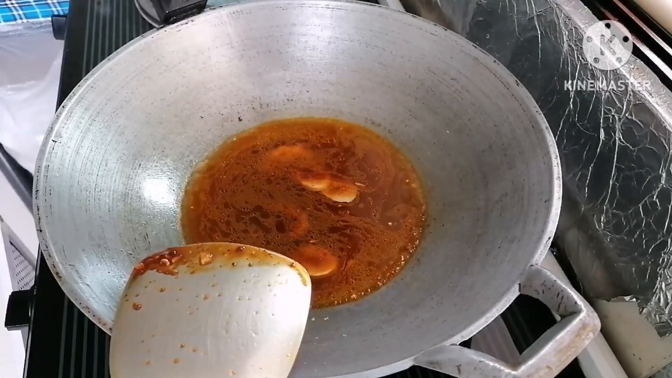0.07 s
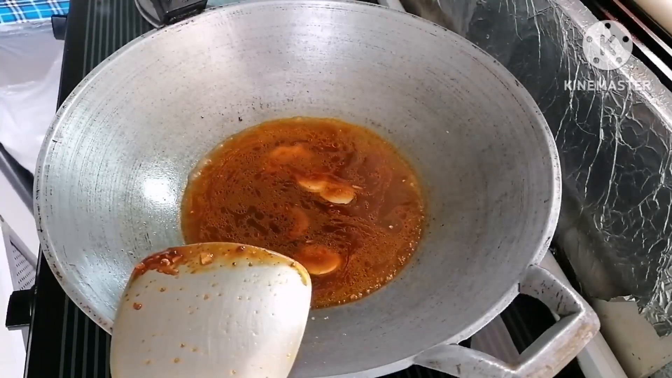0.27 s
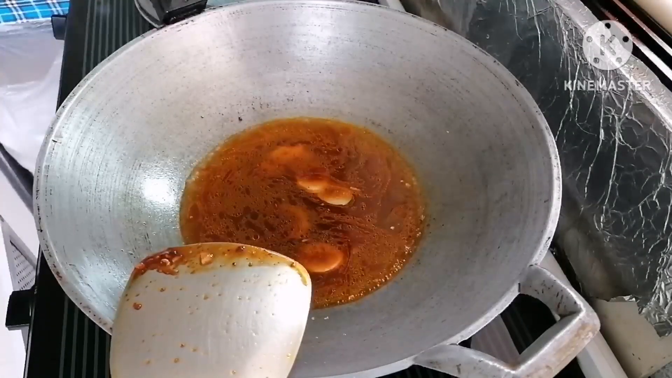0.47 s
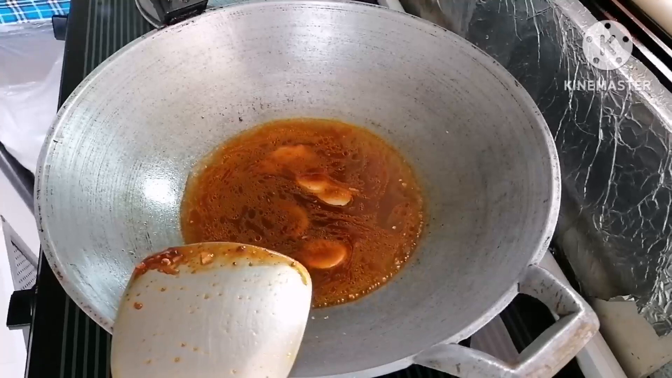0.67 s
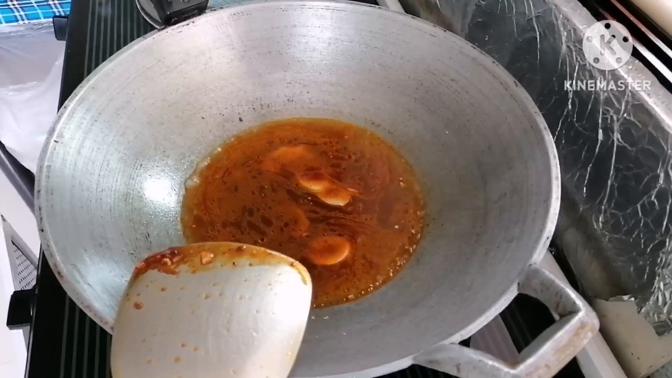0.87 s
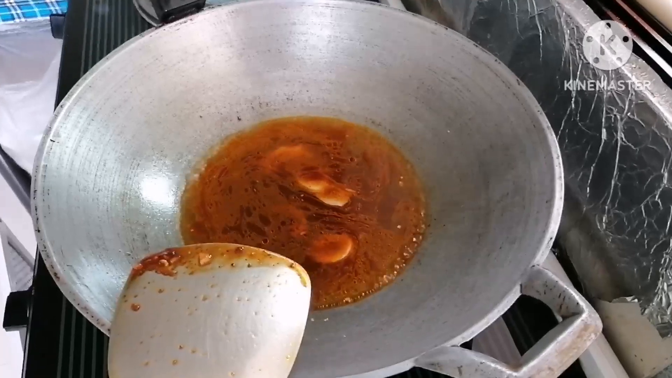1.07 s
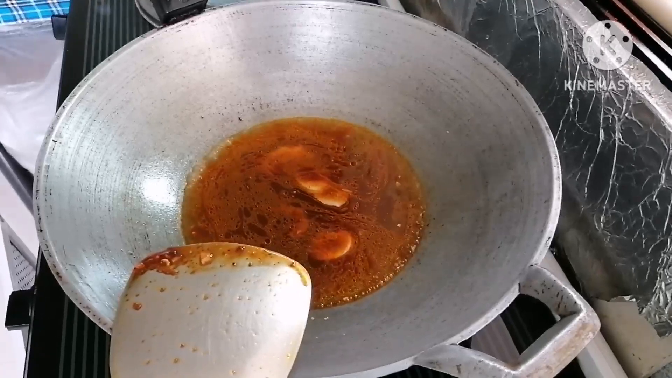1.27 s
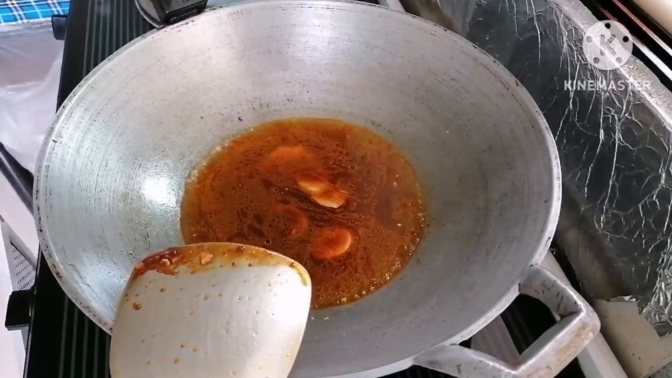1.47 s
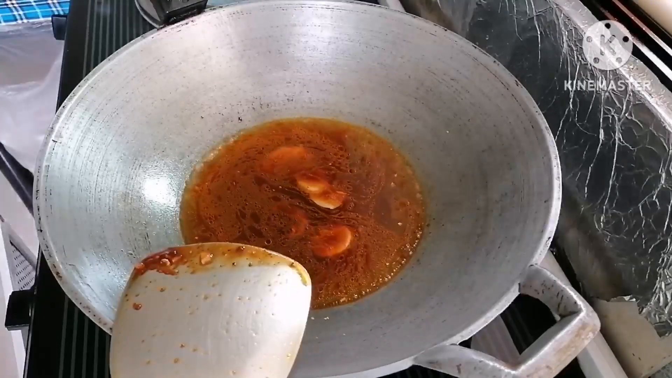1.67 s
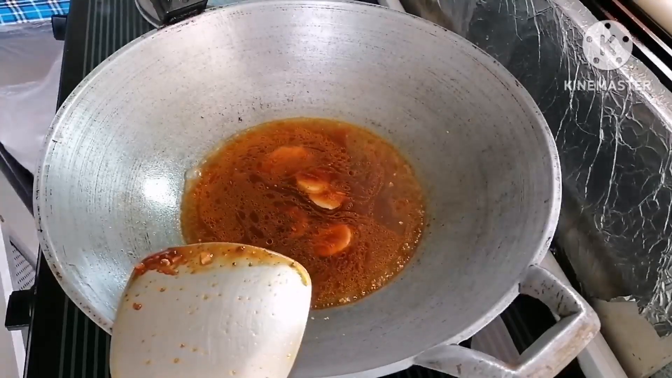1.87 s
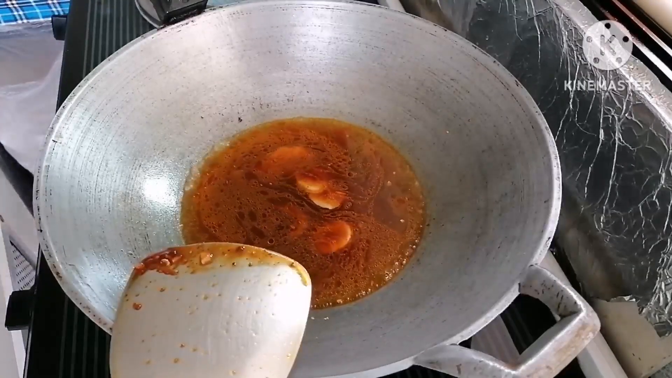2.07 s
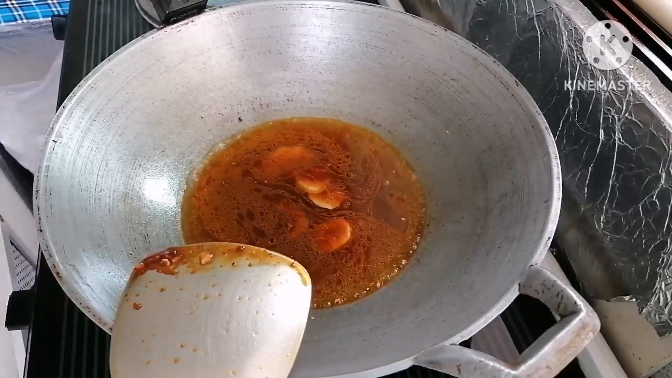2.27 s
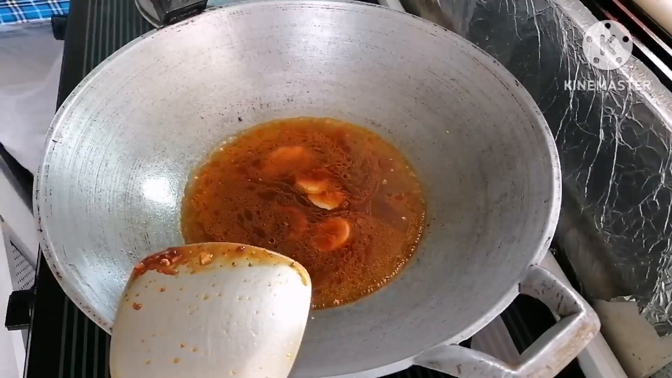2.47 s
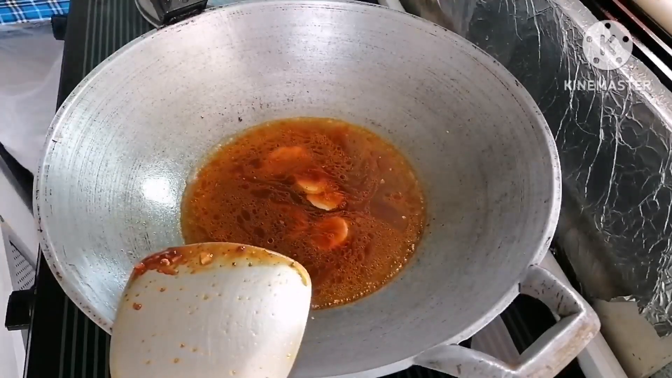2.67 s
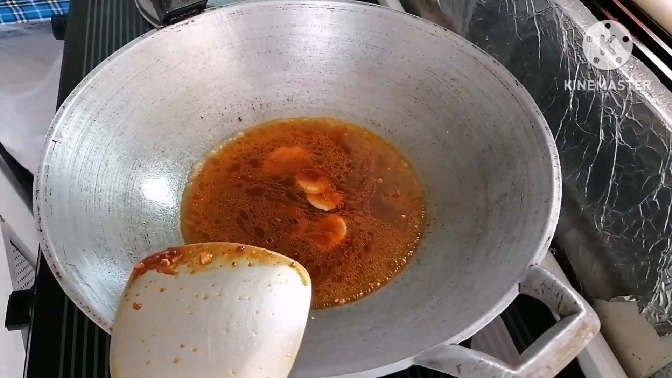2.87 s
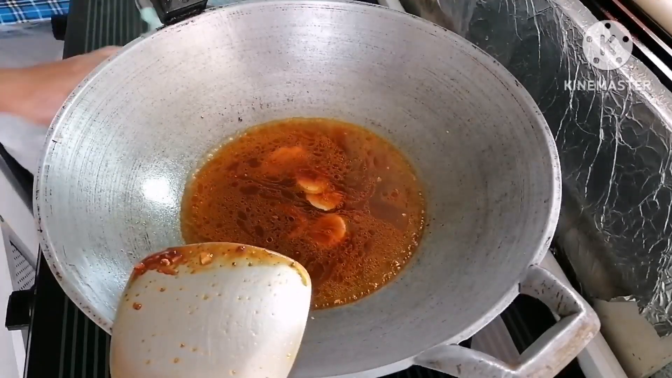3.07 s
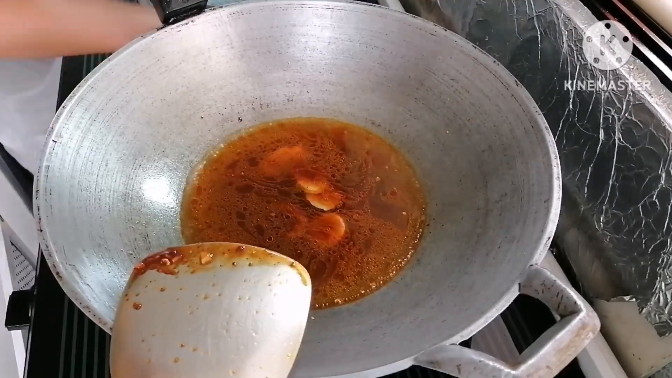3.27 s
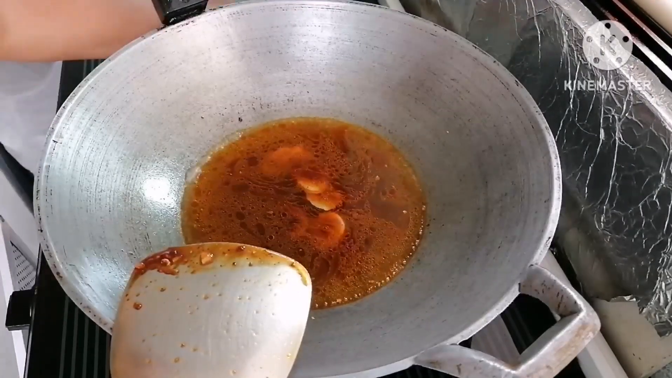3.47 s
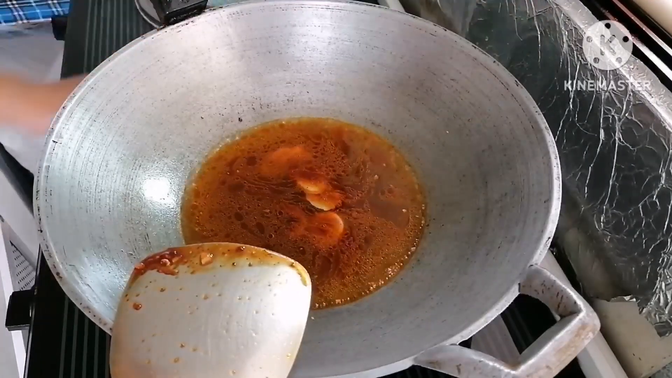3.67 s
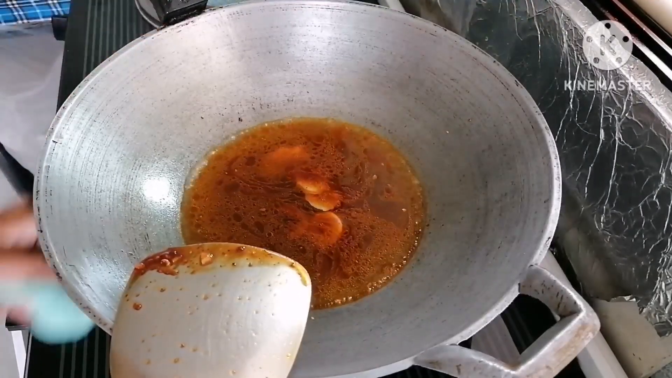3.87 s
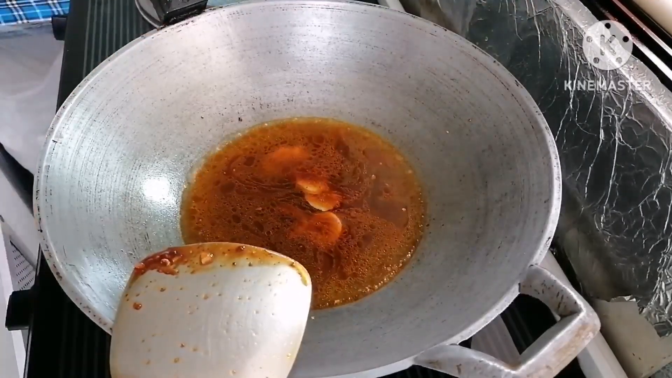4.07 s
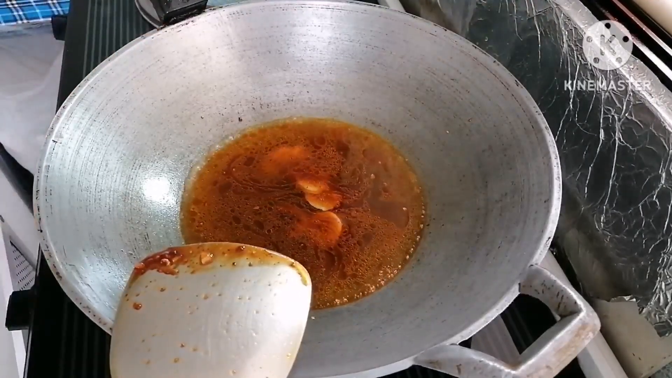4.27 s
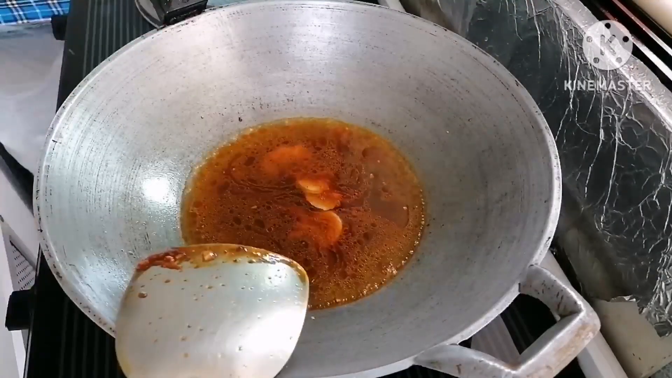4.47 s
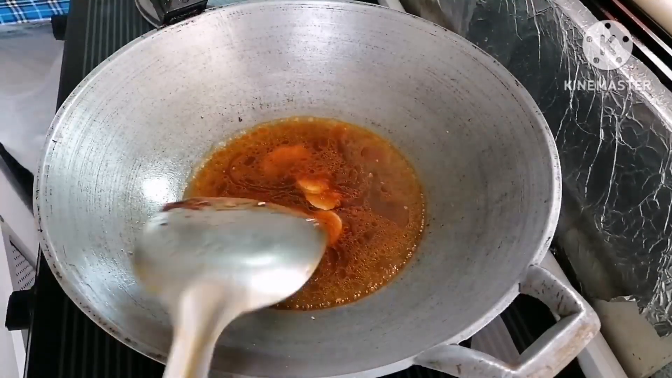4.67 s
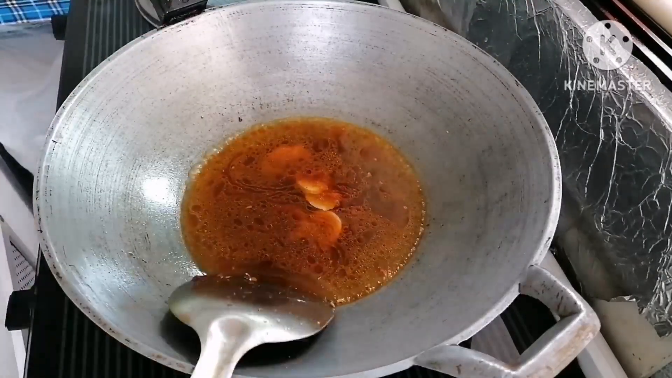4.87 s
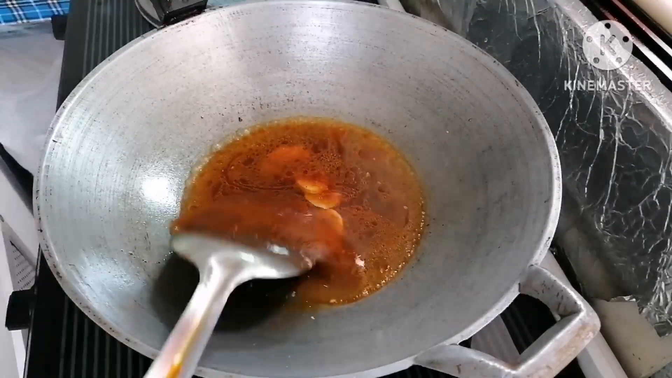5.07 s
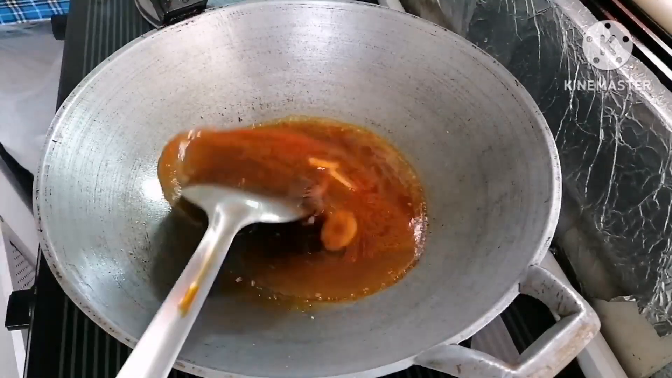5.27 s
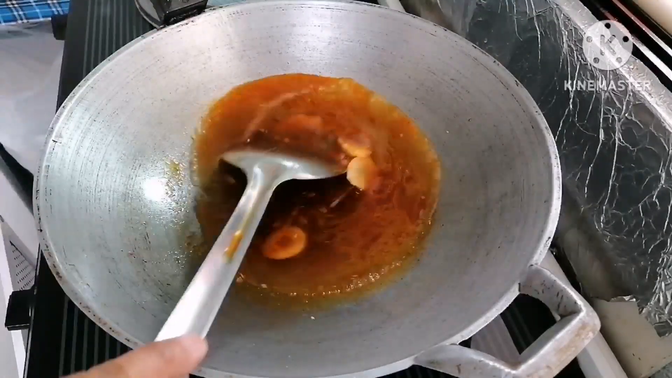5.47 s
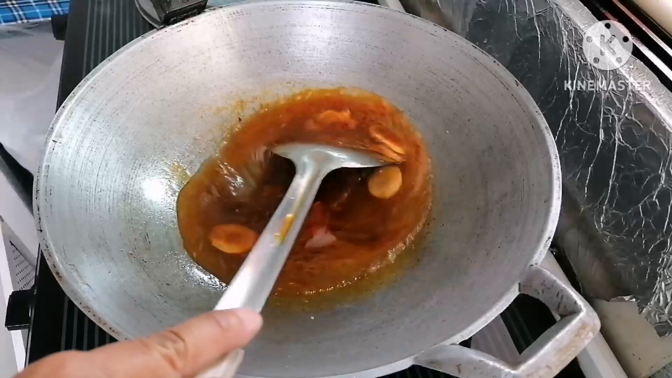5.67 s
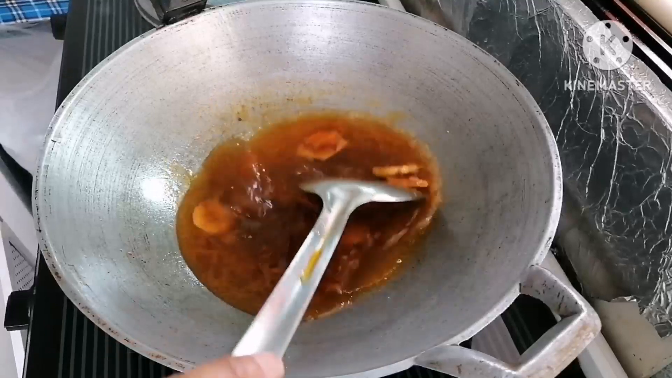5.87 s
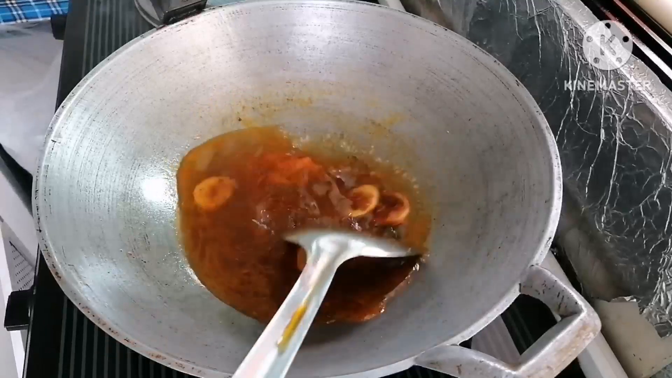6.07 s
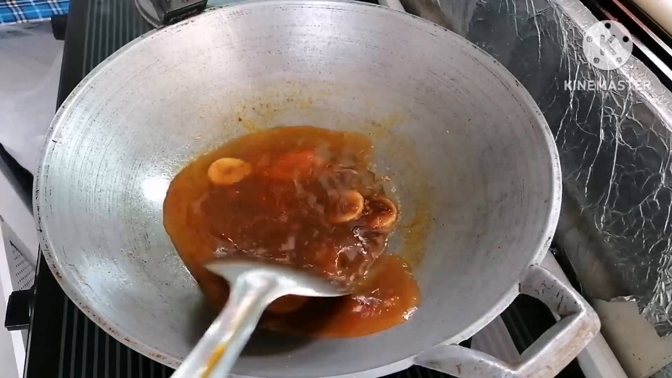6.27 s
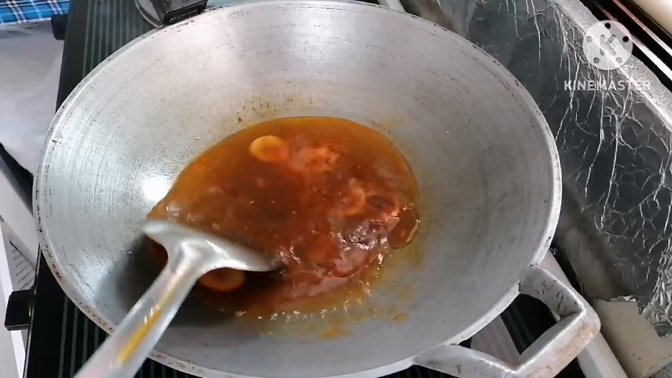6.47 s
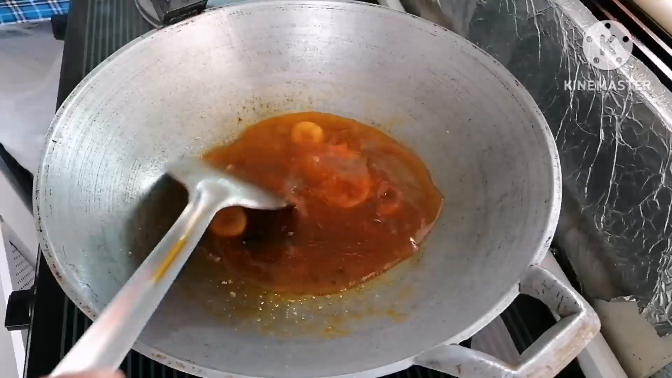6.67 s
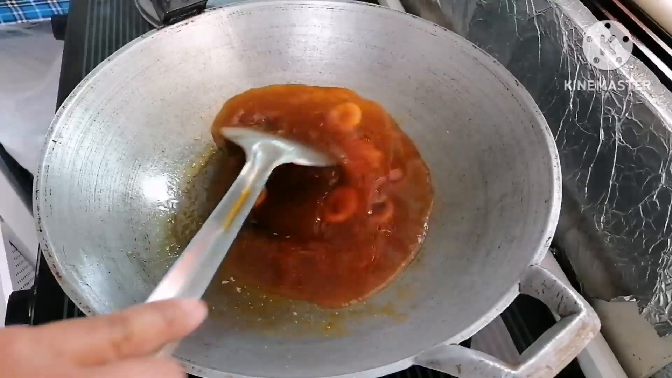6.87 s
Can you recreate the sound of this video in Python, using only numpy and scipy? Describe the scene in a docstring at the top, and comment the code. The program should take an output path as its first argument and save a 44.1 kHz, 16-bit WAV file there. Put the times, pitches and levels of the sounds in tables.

```python
"""A metal utensil slides and squeals over the crackle of sauce simmering in an aluminium wok on a gas ring.
A pot is nudged and dragged; then a steel ladle knocks into the wok and scrapes round it in a few pushes.
Sauce meets the hot wall, and the sizzle flares up and slowly settles. Bubbles are filtered random clicks,
spits are short snaps with noise, metal is ringing modes and moving resonances, and the flame is coloured noise."""
import sys
import numpy as np
from scipy import signal
from scipy.fft import rfft, irfft
from scipy.io import wavfile

SR = 44100
rng = np.random.default_rng(int(sys.argv[2]) if len(sys.argv) > 2 else 0)


def bounce(signal):
    """Save signal as a 16-bit WAV file at the path given by the first command-line argument."""
    frames = np.transpose(np.atleast_2d(signal))
    limited = np.clip(frames, -1, 1)
    pcm = np.round(limited * 32767).astype(np.int16)
    wavfile.write(sys.argv[1], SR, pcm)


N = 304290  # length in samples

# flame level; only its movement about the mean counts: time_s, level_db
FLAME = [(1.0, -56), (1.87, -59), (3.09, -52.5), (4.43, -55.5), (5.19, -52.5), (6.6, -49.5), (6.9, -44)]
FLAME_DB = -52.5
# colour of the flame: freq_hz, level_db
BURNER_COLOUR = [(20, -3.5), (50, -8), (80, 5.5), (100, -2), (120, -3), (170, -7), (300, -9), (600, -20.5),
                 (1500, -44)]

# faint low rumble nearby: start_s, length_s, level_db; its resonances: freq_hz, width_hz, level_db
RUMBLE = [(2.86, 0.075, -48), (3.08, 0.16, -65), (3.8, .35, -56)]
RUMBLE_TONES = [(119, 6.9, 9.5), (264, 67, 3)]
# a metal utensil slides nearby: start_s, length_s, level_db; its resonances: freq_hz, width_hz, level_db
UTENSIL = [(0, 0.058, -29)]
UTENSIL_TONES = [(292, 160, -21.5), (500, 120, -16), (588, 170, -10.5), (805, 190, -9.5), (1060, 180, -9.5),
                 (1590, 260, -9.5), (2100, 510, -10), (2510, 280, -13), (3050, 630, -17), (8000, 4800, -30)]
# it squeals as it goes: start_s, length_s, level_db, pitch_hz
SQUEALS = [(.004, 0.014, -29.5, 1545), (.027, .002, -28, 1570), (.038, 0.0042, -25.5, 1555),
           (.06, 0.0035, -36, 1520), (.077, 0.022, -31.5, 1570), (.115, .016, -34, 1545),
           (.156, 0.02, -37, 1520)]
# a pot is first nudged: start_s, length_s, level_db; its resonances: freq_hz, width_hz, level_db
NUDGE = [(.63, 0.056, -41)]
NUDGE_TONES = [(323, 140, 3), (544, 280, 6.5), (670, 130, -8)]
# then it gives and is dragged: start_s, length_s, level_db; its resonances: freq_hz, width_hz, level_db
DRAG = [(.775, .03, -31.5), (.84, 0.018, -25.5), (.868, 0.019, -27), (.912, .01, -34)]
DRAG_TONES = [(314, 100, 0.5), (650, 340, -0.5), (1048, 63, 4), (1166, 160, 2), (1537, 49, 5.5),
              (1860, 300, -2.5), (2130, 170, 3), (2370, 190, 3.5), (2625, 87, 5), (2830, 360, 1),
              (3120, 280, 1), (3710, 220, -1), (5900, 8300, -8)]
# it catches on the way: start_s, rim_db, base_db
CATCHES = [(0.824, -31, -50), (.832, -46, -21.5), (.845, -34, -46), (.867, -31, -47), (.875, -37, -22.5),
           (.889, -35, -30), (.903, -40, -37)]
# modes of the pot's rim and of its base: freq_hz, level_db, t60_s
POT_RIM = [(1080, -4, 0.12), (2190, -10, .16), (2595, -1.5, .5), (2665, -8, .3), (3150, -9, .12)]
POT_BASE = [(309, -3, 0.059), (355, -15, .08), (1044, -7, 0.073), (1240, -5, .05)]
SLIDE_RISE_S = 0.0099

# sauce slops under the ladle and soft bumps reach the stove: peak_s, level_db, rise_s, fall_s
SLOPS = [(1.473, -35.5, 0.0009, 0.0066), (5.08, -36.5, 0.0096, 0.064), (5.135, -35, 0.0097, 0.036),
         (5.17, -43, 0.0066, 0.033), (5.24, -42.5, 0.03, 0.18), (5.8, -54, 0.086, 0.54)]
# colour of the slops: freq_hz, level_db
SLOP_COLOUR = [(50, -7), (150, 4.5), (260, 4), (420, -3), (660, 2), (950, 2.5), (2000, -59)]
# air trapped as the ladle plunges in: start_s, level_db, pitch_hz
GLUGS = [(5.086, -31, 620), (5.121, -35, 525), (5.129, -38, 229), (5.139, -30, 476)]

# the ladle lands and bounces, relative levels: start_s, blow_db, hard_crack_db
BLOWS = [(5.0665, -2, -2), (5.0746, -7, -2), (5.0841, -11, -10), (5.1052, -8, -9), (5.1173, -11, -8),
         (5.1343, -13, -9), (5.16384, -19, -14)]
# colour of the crack: freq_hz, level_db
KNOCK_COLOUR = [(60, -19), (300, -12), (600, -7), (1000, 6.5), (1900, 5), (2800, -3), (5500, 3),
                (10000, -6), (15000, -16)]
# the wok's modes, struck on the wall or rubbed on the bottom: freq_hz, struck_db, rubbed_db, t60_s
WOK_MODES = [(351, -12, -7, 0.24), (656.3, -9, 10, 0.65), (956, -1, -17, .12), (1114, -4, -4.5, 1),
             (1136, -12, -25, 0.63), (1360, -14, -15, 0.21), (1482, -12, -3, 0.2), (1476, 1, -4, 0.39),
             (1488, -3, -8, 0.24), (1530, -16, -4, 0.24), (1647, -10, -8.5, 0.51), (1710, -11, -16, 0.33),
             (1765, -11, -4, .2), (1890, -19, -13, 0.22), (1914, -15, -7, 0.14), (2100, -16, -16, .24),
             (2450, -25, -8, 0.37), (2670, -23, 4, 0.17), (2900, -5, -7, 0.24), (5360, -18, -5, .15),
             (5800, -18, -5, .12)]
# pushes of the ladle:
# start_s, length_s, pressure_db, blade_hiss_db, contact_resonance_hz, contact_width_hz, edge_resonance_hz
PUSHES = [(5.351, 0.015, -44, -37, 3430, 600, 3500), (5.587, 0.19, -24, -25.5, 1820, 1290, 5560),
          (5.82, 0.026, -25, -29, 1460, 700, 5400), (5.885, 0.041, -31, -43, 1590, 340, 5450),
          (5.95, 0.021, -36, -39, 2750, 1200, 5440), (5.991, 0.014, -33, -38, 2100, 700, 5400),
          (6.05, 0.013, -43, -29, 3030, 900, 5600), (6.233, 0.025, -40.5, -34, 1200, 700, 5450),
          (6.46, 0.07, -36.5, -34.5, 2630, 1220, 5700), (6.582, 0.035, -34.5, -32, 1680, 1200, 5600),
          (6.652, .012, -37.5, -37, 2310, 450, 5450), (6.707, 0.033, -53, -34, 2900, 600, 5400),
          (6.78, 0.037, -55, -36, 2920, 600, 4830)]
# colour of the blade's hiss: freq_hz, level_db
BLADE_COLOUR = [(400, -19.5), (1000, -11), (1700, -14), (2900, 3), (3800, 3), (4900, 4), (5500, 0),
                (6200, -3), (7000, 1), (8200, -5), (9400, 4), (12000, -74), (15000, -71)]
PUSH_RISE_S, PUSH_FALL_S = 0.015, 0.017
# longer pushes build up and run out more slowly, by these shares of their length
RUN_IN, BLADE_RUN_IN, RUN_OUT = 0.15, 0.51, 0.32
CONTACT_SAG_HZ_PER_S = 1900  # the contact resonance sinks through a push
# the edge hisses first, then beds in
BLADE_LEAD_S, BLADE_RISE_S, BLADE_SAG_DB_PER_S = 0.018, 0.022, 36
EDGE_WIDTH_HZ = 710
# the blade catches and lets go: mean gap, fall time, height of the leap
JERK_GAP_S, JERK_FALL_S, JERK_DB = .027, 0.0087, 6
# the blade judders on the metal: start_s, length_s, level_db, pitch_hz
JUDDER = [(5.165, 0.022, -39, 680), (6.745, 0.018, -39.5, 679.6), (6.775, 0.035, -47.5, 721),
          (6.822, 0.018, -40, 676), (6.858, 0.0087, -39, 718), (6.885, .02, -42, 669)]
# partials of the judder: multiple_of_pitch, level_db
JUDDER_TONES = [(.5, -10), (1, 0), (1.73, -6)]

# the simmer; only its movement about the mean counts: time_s, fine_fizz_db, large_bubbles_db
SIMMER = [(.4, -36.5, -34.5), (1.08, -37, -35), (1.35, -38, -34.5), (1.72, -36.5, -35), (1.95, -37, -37.5),
          (2.35, -37, -35), (2.53, -36, -35.5), (2.65, -38.5, -34.5), (2.8, -36, -34), (3.02, -38.5, -36),
          (3.2, -37, -34.5), (3.5, -36, -35.5), (3.77, -34.5, -34.5), (4.05, -37, -35.5),
          (4.27, -38, -36.8), (4.45, -36, -35.5), (4.72, -38.5, -36.5), (5.0, -37.5, -36.5)]
SIMMER_DB, LARGE_DB = -37, 0.5  # mean heat level before the sizzle's gain, mean share of large bubbles
# sauce meets the hot wall, on the same level scale as the simmer: start_s, hold_s, level_db
FLARE = (5.8, .08, -29)
FLARE_RISE_S, FLARE_FALL_S, FLARE_LARGE_DB = .35, .76, 3.5  # at its height the bubbles are larger
# colour of the sizzle: freq_hz, level_db
SIZZLE_COLOUR = [(250, -15.5), (480, -12.5), (720, -5), (920, -5), (1150, -.6), (1750, -1), (2850, 3.5),
                 (3900, -0.5), (5400, 0), (6400, -2), (8400, -2.5), (9300, 2.5), (11000, 1), (12500, -5.5),
                 (15000, -11.5)]
POP_LOW_HZ, POP_HIGH_HZ = 1560, 3200  # pitches of single bubbles
# the loudest spits of sauce, levels before the high-pass: start_s, level_db, pitch_hz
SPITS = [(0.928, 0, 9100), (0.958, -10.5, 2800), (1.053, -9, 5800), (1.163, -8, 2400), (1.265, -10, 6000),
         (1.286, -8, 3000), (1.461, -9, 2700), (1.611, -12, 1500), (1.659, -13.5, 1400),
         (1.73, -10.5, 2010), (1.838, -7, 3400), (2.42, -10, 8000), (2.505, -3, 7900), (2.542, -5, 9500),
         (2.578, -14, 8000), (3.233, -19, 2600), (3.304, -11, 2800), (3.501, -7, 9100), (3.561, -10, 2400),
         (4.162, -10.5, 1500), (4.562, -6.5, 4000), (4.635, -13, 2900), (4.786, -5, 3460),
         (4.937, -10, 2600), (5.163, -2, 8800), (5.195, -3, 9300), (5.271, -6, 3600), (6.176, -2, 6500),
         (6.238, 0, 5500), (6.258, -7, 3000)]
# lesser spits come at random
SPITS_PER_S, LESSER_SPIT_DB, SPIT_LOW_HZ, SPIT_HIGH_HZ = 1.1, -25, 2800, 9000

# the two microphone ports: freq_hz, left_minus_right_db
PORTS = [(100, -3), (350, -2.5), (600, -0.7), (1300, -1.5), (1700, -5), (2900, -2.5), (4000, -0.5),
         (6000, -3), (7500, 4), (9300, 2.5), (10000, -2), (10900, -5.5), (13000, -2.5)]
KITCHEN_T60_S, CUTOFF_HZ = 0.42, 15400


def from_db(db):
    """Decibels to gain."""
    return 10 ** (np.asarray(db) / 20)


def rms_one(x):
    """Scale a stereo sound so that its middle has rms 1."""
    return x / np.sqrt(np.mean(x.mean(0) ** 2) + 1e-20)


def in_time(rows):
    """Each column of a curve at every sample."""
    s, *columns = np.transpose(rows)
    return [np.interp(np.arange(N) / SR, s, column) for column in columns]


def swell(s, hold_s, db, rise_s, fall_s, sag_db_per_s=0):
    """Gain that rises to its level at s, holds (perhaps sagging) and dies away."""
    t = np.arange(N) / SR - s
    away = np.maximum(-t / rise_s, (t - hold_s) / fall_s).clip(0, 20)
    return from_db(db - sag_db_per_s * t.clip(0, hold_s)) * np.exp(-away)


def drift(corner_hz):
    """Slow chance with spread about 1: noise through a double pole, made at every 40th sample."""
    r = np.exp(-2 * np.pi * corner_hz * 40 / SR)
    noise = rng.standard_normal(N // 40 + 2002)
    slow = signal.lfilter([1], [1, -2 * r, r * r], noise)[2000:]  # skip the filter's start
    return np.interp(np.arange(N) / 40, np.arange(len(slow)), slow / slow.std())


def colour(x, spectrum, size=4096):
    """Causal (minimum-phase) filter that follows a spectrum, by way of the cepstrum."""
    hz, db = np.transpose(spectrum)
    grid = np.maximum(np.arange(size // 2 + 1) * SR / size, 1)
    grid_db = np.interp(np.log(grid), np.log(hz), db)
    cepstrum = irfft(np.log(from_db(grid_db)))
    cepstrum[1:size // 2] *= 2
    cepstrum[size // 2 + 1:] = 0
    impulse = irfft(np.exp(rfft(cepstrum)))
    return signal.oaconvolve(x, impulse[None], axes=1)[:, :N]


def resonator(hz, width_hz):
    """Coefficients of a resonance with gain about 1 on top."""
    r = np.exp(-np.pi * width_hz / SR)
    return (1 - r * r) / 2 * np.array([1, 0, -1]), [1, -2 * r * np.cos(2 * np.pi * hz / SR), r * r]


def resonate(x, tones):
    """Parallel resonances, each passed twice, with deep valleys between them."""
    out = 0
    for hz, width_hz, db in tones:
        b, a = resonator(hz, width_hz)
        once = signal.lfilter(b, a, x + 1e-18)
        out = out + from_db(db) * signal.lfilter(b, a, once)
    return out


def ring(force, modes):
    """Decaying sines set off by a force, with alternating sign from mode to mode."""
    out = 0
    for k, (hz, db, t60_s) in enumerate(modes):
        r, w = from_db(-60 / (t60_s * SR)), 2 * np.pi * hz / SR
        tone = signal.lfilter([0, np.sin(w)], [1, -2 * r * np.cos(w), r * r], force + 1e-18)
        out = out + (-1) ** k * from_db(db) * tone
    return out


def glide(x, centre_hz, width_hz, size=256):
    """A steep-sided resonance whose centre and width move, updated block by block."""
    out, state = np.zeros((2, N)), np.zeros((2, 2, 2))
    for i in range(0, N, size):
        section = np.concatenate(resonator(centre_hz[i], width_hz[i]))
        out[:, i:i + size], state = signal.sosfilt([section, section], x[:, i:i + size], zi=state)
    return out / np.sqrt(width_hz)


def clicks(per_s, spread_db, lag_s, pan_db):
    """Random clicks of uneven size and sign, each with its own lag and balance between the ports."""
    at = np.flatnonzero(rng.random(N) < per_s / SR)
    size_db = spread_db * np.minimum(rng.exponential(1, len(at)), 3.3)
    size = from_db(size_db) * rng.choice([-1, 1], len(at))
    lag, pan = rng.standard_normal(len(at)), rng.uniform(-1, 1, len(at))
    right_at = np.clip(at + np.round(lag * lag_s * SR).astype(int), 0, N - 1)
    out = np.zeros((2, N))
    out[0, at] = size * from_db(pan_db * pan)
    out[1, right_at] = size * from_db(-pan_db * pan)
    return out + 1e-18


def kitchen(x, wet_db):
    """Add dense reflections from nearby walls: decaying noise, different at each port."""
    t = np.arange(SR // 2) / SR
    tail = rng.standard_normal((2, len(t))) * from_db(-60 * t / KITCHEN_T60_S) * (t > .002)
    tail /= np.sqrt(np.sum(tail ** 2, axis=1, keepdims=True))
    return x + from_db(wet_db) * signal.oaconvolve(x, tail, axes=1)[:, :N]


def balance(left_minus_right_db):
    """Gains of the left and right ports."""
    return from_db([[left_minus_right_db / 2], [-left_minus_right_db / 2]])


def rub(moves, tones, fall_s, per_s, wet_db, pan_db):
    """Stick and slip excite the resonances of a sliding object, which ring on after the push."""
    push = np.max([swell(s, length, db, SLIDE_RISE_S, fall_s) for s, length, db in moves], axis=0)
    slips = clicks(per_s, spread_db=2.0, lag_s=.00005, pan_db=2.5)
    steady = resonate(slips, tones).mean(0).std()  # loudness under a constant push of gain 1
    return kitchen(resonate(slips * push, tones) / steady, wet_db) * balance(pan_db)


def sing(grips, partials, rise_s, fall_s, waver, rough_db):
    """Metal grips metal in short fits; each fit sings at its own unsteady pitch."""
    levels = np.array([swell(s, length, db, rise_s, fall_s) for s, length, db, _ in grips])
    pitch_hz = np.average([np.full(N, hz) for *_, hz in grips], axis=0, weights=levels ** 2)
    phase = 2 * np.pi * np.cumsum(pitch_hz * (1 + waver * drift(110))) / SR
    tone = sum(from_db(db + rough_db * drift(140)) * np.sin(ratio * phase) for ratio, db in partials)
    return np.sqrt(2) * levels.max(0) * np.array([tone, tone])


def burner(apart=0.37, swing=0.72):
    """The flame's low rumble: coloured noise, nearly the same at both ports, its movement scaled by swing."""
    flame_db, = in_time(FLAME)
    air = rng.standard_normal(N) + apart * rng.standard_normal((2, N))
    level_db = FLAME_DB + swing * (flame_db - flame_db.mean())
    return from_db(level_db) * rms_one(colour(air, BURNER_COLOUR))


def nearby_rumble():
    """Faint low swells of clicks through two low resonances."""
    return rub(RUMBLE, RUMBLE_TONES, fall_s=0.066, per_s=900, wet_db=-9, pan_db=-1.5)


def utensil_slide():
    """Stick and slip along the utensil excite its resonances."""
    return rub(UTENSIL, UTENSIL_TONES, fall_s=0.033, per_s=1500, wet_db=-2.5, pan_db=-3.0)


def squeal():
    """The sliding utensil locks onto one of its modes in a rough, broken squeak."""
    squeak = sing(SQUEALS, [(1, 0)], rise_s=.005, fall_s=.006, waver=.02, rough_db=3)
    return kitchen(squeak, wet_db=-15)


def pot_nudge():
    """A brief rub excites the low resonances of the pot."""
    return rub(NUDGE, NUDGE_TONES, fall_s=.02, per_s=1300, wet_db=-2, pan_db=-3.0)


def pot_drag():
    """Stick and slip under the dragged pot excite its resonances."""
    return rub(DRAG, DRAG_TONES, fall_s=0.023, per_s=900, wet_db=-4, pan_db=-2.5)


def pot_clinks(clack_db=10, clack_s=0.0036, pan_db=-5.0):
    """Each catch of the pot clacks through its body, thuds in its base and leaves the rim ringing."""
    rim, base = np.zeros((2, 2, N))
    for s, rim_db, base_db in CATCHES:
        at = round(s * SR)
        rim[:, at], base[:, at] = from_db(rim_db), from_db(base_db)
    clacks = sum(swell(s, 0, db + clack_db, .0002, clack_s) for s, db, _ in CATCHES)
    noise = rng.standard_normal(N) + rng.standard_normal((2, N))
    body = rms_one(resonate(noise, DRAG_TONES))
    pot = ring(rim, POT_RIM) + ring(base, POT_BASE) + clacks * body
    return kitchen(pot, wet_db=-6) * balance(pan_db)


def slops():
    """Sauce slops and soft bumps: dull swells that rise quickly and die away."""
    swells = sum(swell(s, 0, db, rise, fall) for s, db, rise, fall in SLOPS)
    grains = clicks(4000, spread_db=3.5, lag_s=.00008, pan_db=-2)
    return swells * rms_one(kitchen(colour(grains, SLOP_COLOUR), wet_db=-14))


def glugs(cycles=14):
    """The ladle traps a few pockets of air, which ring low and fall by 60 dB in this many cycles."""
    out = np.zeros((2, N))
    for s, db, hz in GLUGS:
        out += ring(signal.unit_impulse(N, round(s * SR)), [(hz, db, cycles / hz)])
    return kitchen(out, wet_db=-16)


def wok(force, rubbed):
    """The pan rings in its modes; how strongly depends on where it is touched."""
    modes = [(hz, rubbed_db if rubbed else struck_db, t60) for hz, struck_db, rubbed_db, t60 in WOK_MODES]
    return ring(force, modes)


def ladle_knock(ring_db=-28.5, crack_db=-17.0, crack_s=0.0084):
    """The ladle lands: each bounce cracks and sets the wok ringing."""
    force, crack, t = np.zeros((2, N)), np.zeros(N), np.arange(N) / SR
    for s, blow_db, hard_db in BLOWS:
        at = round(s * SR)
        force[:, at] = from_db(blow_db)
        crack[at:] = np.maximum(crack[at:], from_db(hard_db) * np.exp(-t[:N - at] / crack_s))
    noise = rng.standard_normal(N) + 1.9 * rng.standard_normal((2, N))
    grit = rms_one(colour(noise, KNOCK_COLOUR))
    ringing = kitchen(from_db(ring_db) * wok(force, rubbed=False), wet_db=-15)
    return ringing + kitchen(from_db(crack_db) * crack * grit, wet_db=-4.5)


def stirring():
    """Pressure, hiss and the moving resonances over all pushes; the strongest push dominates the resonances."""
    t, pressures, hisses, contacts, widths, edges = np.arange(N) / SR, [], [], [], [], []
    for s, length, pressure_db, hiss_db, contact_hz, width_hz, edge_hz in PUSHES:
        fall_s = PUSH_FALL_S + RUN_OUT * length
        pressures.append(swell(s, length, pressure_db, PUSH_RISE_S + RUN_IN * length, fall_s))
        blade_rise_s = BLADE_RISE_S + BLADE_RUN_IN * length
        hisses.append(swell(s - BLADE_LEAD_S, length, hiss_db, blade_rise_s, fall_s, BLADE_SAG_DB_PER_S))
        contacts.append(contact_hz - CONTACT_SAG_HZ_PER_S * (t - s).clip(0, length))
        widths.append(np.full(N, width_hz))
        edges.append(np.full(N, edge_hz))
    contact = np.average(contacts, axis=0, weights=np.power(pressures, 4))
    width = np.average(widths, axis=0, weights=np.power(pressures, 4))
    edge = np.average(edges, axis=0, weights=np.power(hisses, 4))
    return np.max(pressures, axis=0), np.max(hisses, axis=0), contact, width, edge


def jerks(count=500):
    """Gain of the scrape: it leaps at uneven intervals and falls back."""
    t = np.arange(N) / SR
    starts = np.append(0, np.cumsum(JERK_GAP_S * rng.uniform(.5, 1.5, count)))
    since = t - starts[np.searchsorted(starts, t, "right") - 1]
    return from_db(JERK_DB * np.exp(-since / JERK_FALL_S))


def ladle_scrape(contact_db=2.0, ring_db=-7, blade_db=2.0, edge_db=-1.5, chatter_db=1.5):
    """The blade slips in tiny jerks, through two moving resonances and into the wok's modes."""
    pressure, hiss, contact_hz, width_hz, edge_hz = stirring()
    slips = clicks(6000, spread_db=2.5, lag_s=.00008, pan_db=2.5) * from_db(chatter_db * drift(69))
    contact = glide(slips * jerks(), contact_hz, width_hz)
    contact = signal.sosfilt(signal.butter(2, [1000, 7000], "band", fs=SR, output="sos"), contact)
    ringing = rms_one(wok(contact, rubbed=True))
    body = from_db(contact_db) * rms_one(contact) + from_db(ring_db) * ringing
    edge_slips = clicks(5000, spread_db=9.5, lag_s=.00008, pan_db=0.0)
    edge = glide(edge_slips, edge_hz, np.full(N, EDGE_WIDTH_HZ))
    blade = from_db(blade_db) * rms_one(colour(slips, BLADE_COLOUR)) + from_db(edge_db) * rms_one(edge)
    return kitchen(pressure * body + hiss * blade, wet_db=-4.0)


def judder():
    """The blade catches on the pan and groans in a few unsteady partials."""
    groan = sing(JUDDER, JUDDER_TONES, rise_s=.008, fall_s=0.0109, waver=.04, rough_db=3)
    return kitchen(groan, wet_db=-12)


def spits(spray_db=-17, spray_s=.0013):
    """A large bubble snaps once, a fast-dying sine, and sprays fine droplets, a burst of noise."""
    out, t = np.zeros((2, N)), np.arange(SR // 100) / SR
    lesser = []
    for when, pitch in rng.random((round(SPITS_PER_S * N / SR), 2)):
        hz = SPIT_LOW_HZ * (SPIT_HIGH_HZ / SPIT_LOW_HZ) ** pitch
        lesser.append((when * (N - len(t)) / SR, LESSER_SPIT_DB, hz))
    for s, db, hz in SPITS + lesser:
        at = round(s * SR)
        snap = np.sin(2 * np.pi * hz * t) * np.exp(-2.4 * hz * t)
        spray = from_db(spray_db) * rng.standard_normal((2, len(t))) * np.exp(-t / spray_s)
        out[:, at:at + len(t)] += from_db(db) * (snap + spray)
    return kitchen(signal.sosfilt(signal.butter(2, 900, "high", fs=SR, output="sos"), out), wet_db=-8)


def heat():
    """Level of the sizzle and share of large bubbles, in dB: the simmer plus the flare on the hot wall."""
    fizz_db, bubbles_db = (db - db.mean() for db in in_time(SIMMER))
    simmer = from_db(SIMMER_DB + fizz_db)
    flare = swell(*FLARE, FLARE_RISE_S, FLARE_FALL_S)
    large_db = LARGE_DB + bubbles_db - fizz_db + FLARE_LARGE_DB * (flare / flare.max()) ** 2
    return 20 * np.log10(np.hypot(simmer, flare)), large_db


def crackle(busy, per_s=140, spread_db=4.0, spray_s=0.00094):
    """Droplets flash on the hot metal: a sudden bright spurt that dies within a millisecond or two."""
    flashes = np.abs(clicks(per_s * busy * from_db(3 * drift(10)), spread_db, lag_s=.0001, pan_db=5.0))
    power = signal.lfilter([1], [1, -np.exp(-2 / (spray_s * SR))], flashes ** 2 / busy)
    spurts = np.sqrt(power) * rng.standard_normal((2, N))
    bright = signal.butter(1, [5000, 12000], "band", fs=SR, output="sos")
    return rms_one(signal.sosfilt(bright, spurts))


def pops(heat_db, per_s=14, spread_db=2.5, cycles=12, level_db=-10, count=14):
    """Bubbles in the thick sauce pop one by one, each ringing briefly at one of several pitches."""
    rings = 0
    for hz in np.geomspace(POP_LOW_HZ, POP_HIGH_HZ, count):
        bursts = clicks(per_s, spread_db, lag_s=.00005, pan_db=1.5)
        rings = rings + ring(bursts, [(hz, 0, cycles / hz)]) * np.sqrt(hz)
    return from_db(heat_db + level_db) * rms_one(kitchen(rings, wet_db=-2))


def sizzle(per_s=450, spread_db=3.5, clump_db=1.53, hiss_db=-6, gain_db=5.0, crackle_db=-6, count=10):
    """Bubbles burst in clumps, each a snap of about one cycle; a hotter pan bursts more of them."""
    heat_db, large_db = heat()
    busy = from_db(heat_db - np.median(heat_db)) ** 2  # the power grows with the number of bursts
    clumps, snaps = clump_db * drift(35), 0
    for hz in np.geomspace(600, 13000, count):
        rate = per_s * busy * from_db(clumps + 2.5 * drift(14))
        bursts = clicks(rate, spread_db, lag_s=.00009, pan_db=0.0)
        band = signal.butter(1, [hz / 1.45, hz * 1.45], "band", fs=SR, output="sos")
        snaps = snaps + signal.sosfilt(band, rms_one(bursts / np.sqrt(busy)))
    hiss = rms_one(rng.standard_normal((2, N)))
    fizz = rms_one(snaps) + from_db(hiss_db) * hiss + from_db(crackle_db) * crackle(busy)
    large = signal.sosfilt(signal.butter(1, 3500, fs=SR, output="sos"), fizz)  # large bubbles sound low
    fizz = fizz + (from_db(large_db) - 1) * large
    bed = rms_one(kitchen(colour(fizz, SIZZLE_COLOUR), wet_db=-6.0))
    return from_db(heat_db + gain_db) * bed + pops(heat_db + large_db)


def scene():
    """The pan, the ladle a little to the left, and the kitchenware to the right."""
    kitchenware = utensil_slide() + squeal() + pot_nudge() + pot_drag() + pot_clinks()
    ladle = (ladle_knock() + ladle_scrape() + judder()) * balance(1.8)
    sauce = slops() + glugs() + spits() + sizzle()
    return burner() + nearby_rumble() + kitchenware + ladle + sauce


def record(dry):
    """Each port has its own colour; the top is cut."""
    ports = []
    for k, side in enumerate((1, -1)):
        tilt = [(hz, side * db / 2) for hz, db in PORTS]
        ports.append(colour(dry[[k]], tilt))
    low_pass = signal.ellip(10, .2, 80, CUTOFF_HZ, fs=SR, output="sos")
    return signal.sosfilt(low_pass, np.vstack(ports))


dry = scene()
out = record(dry)
bounce(out)
```